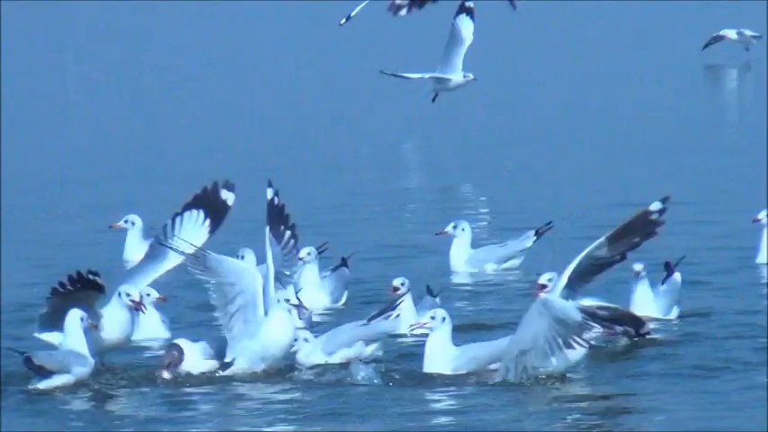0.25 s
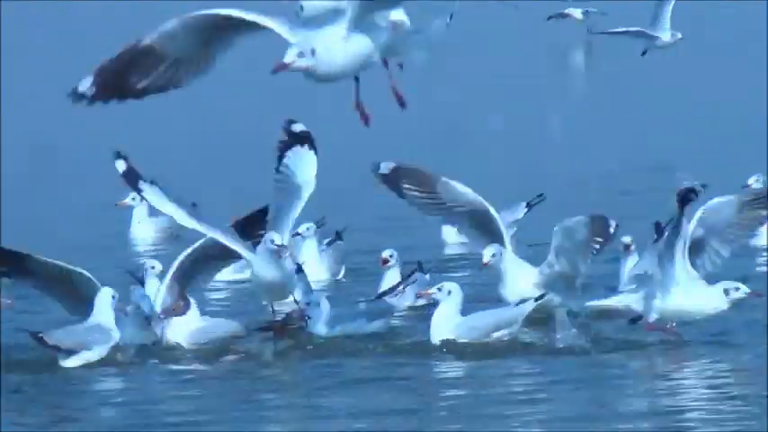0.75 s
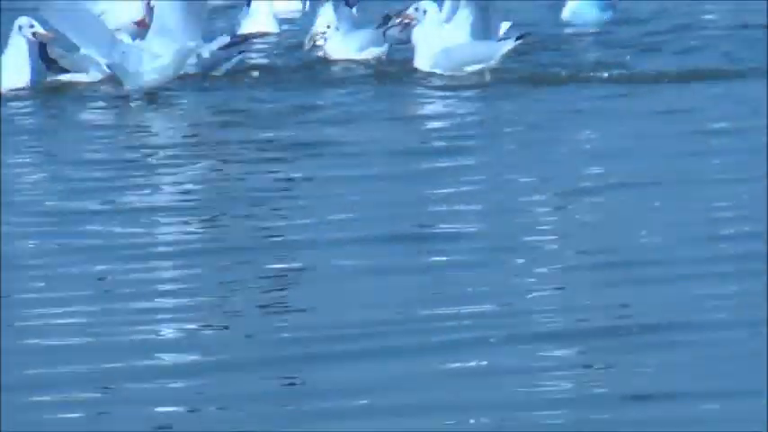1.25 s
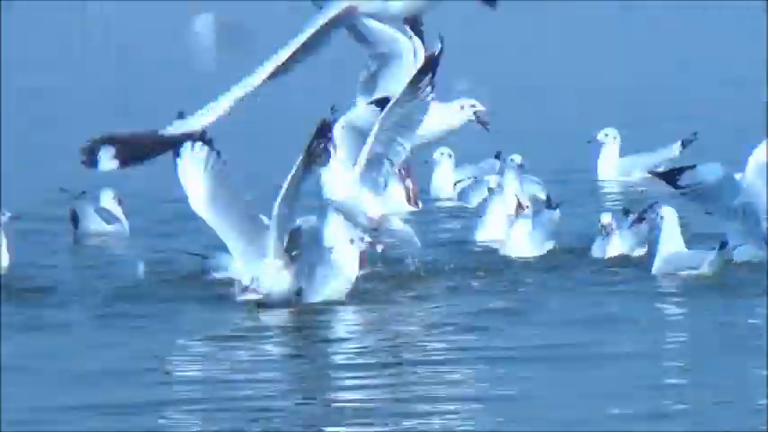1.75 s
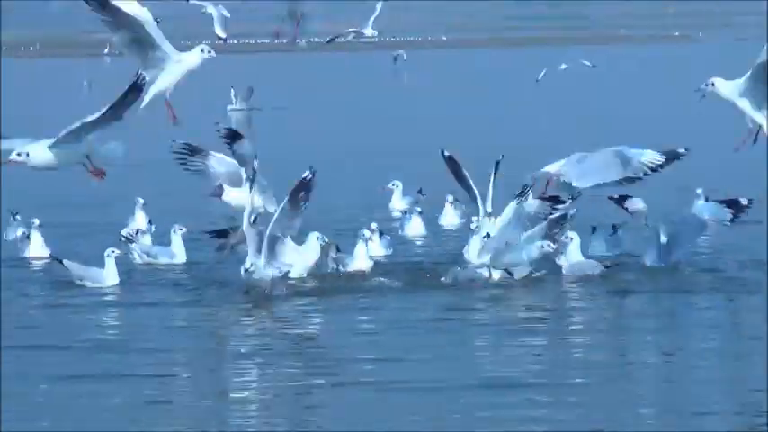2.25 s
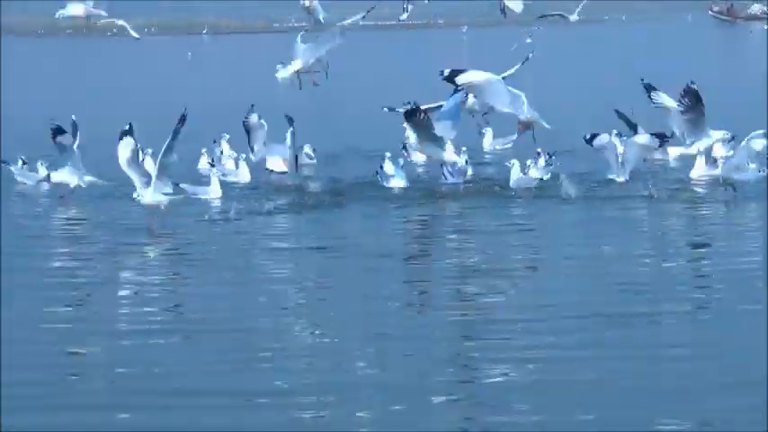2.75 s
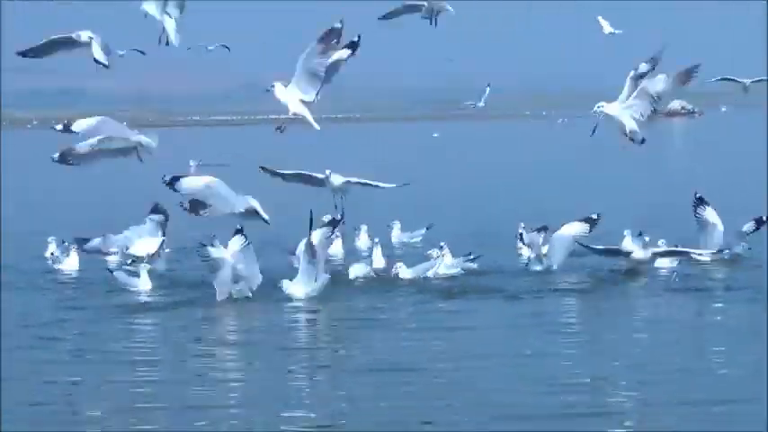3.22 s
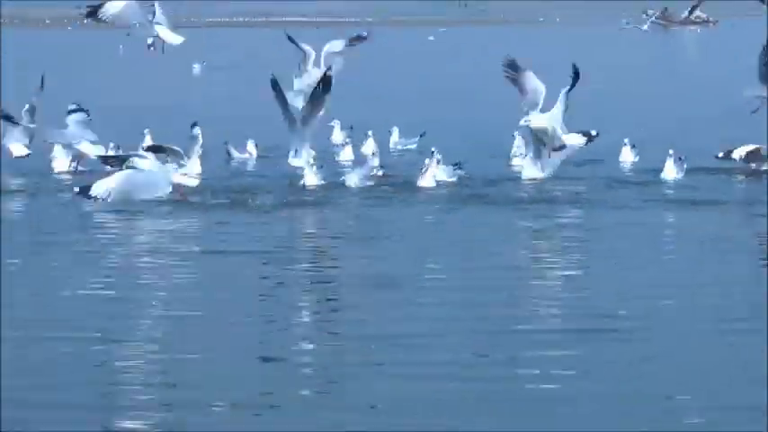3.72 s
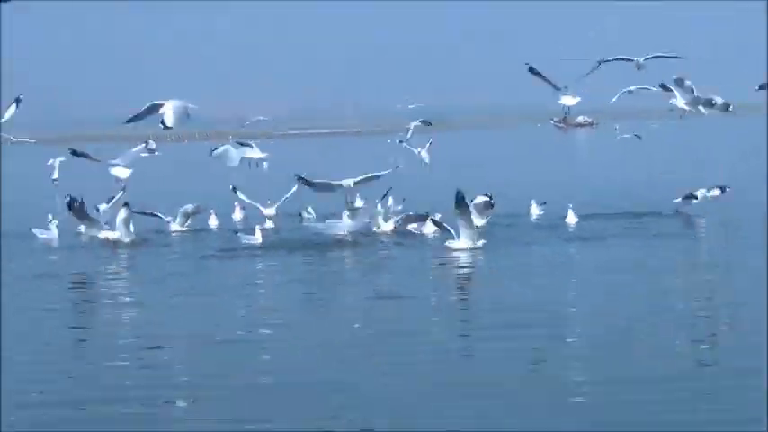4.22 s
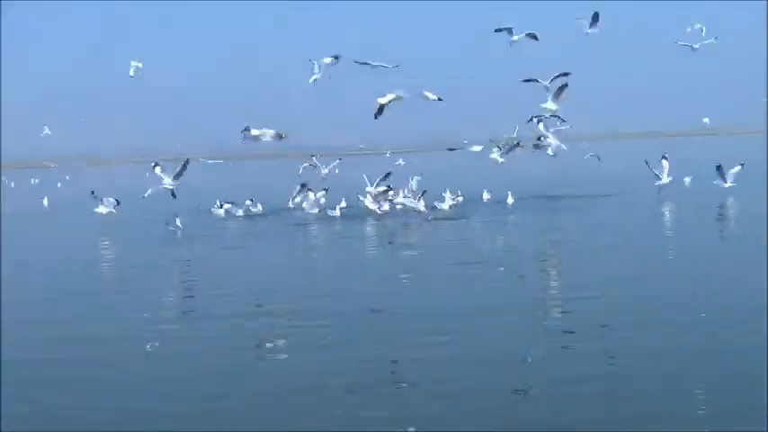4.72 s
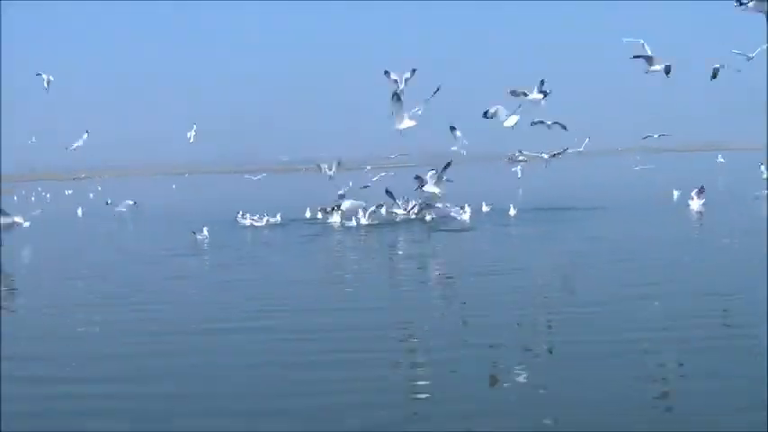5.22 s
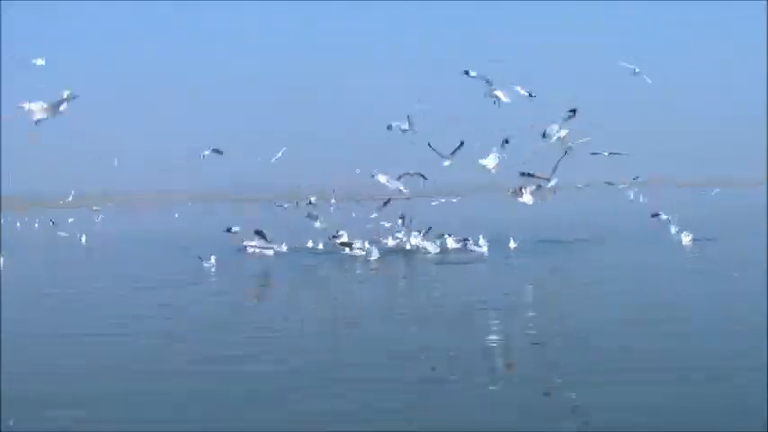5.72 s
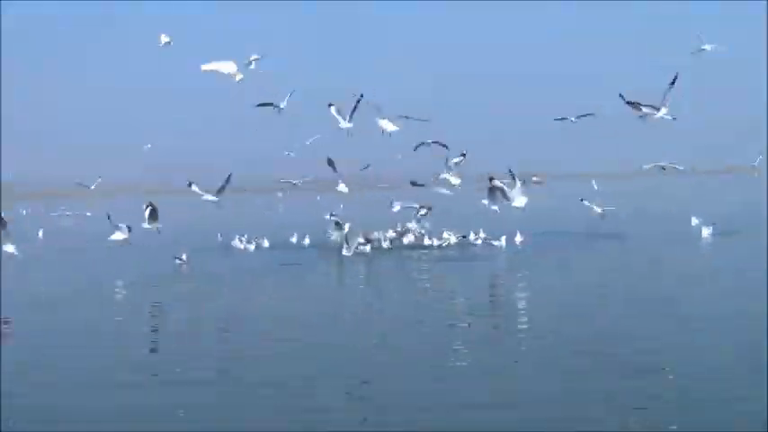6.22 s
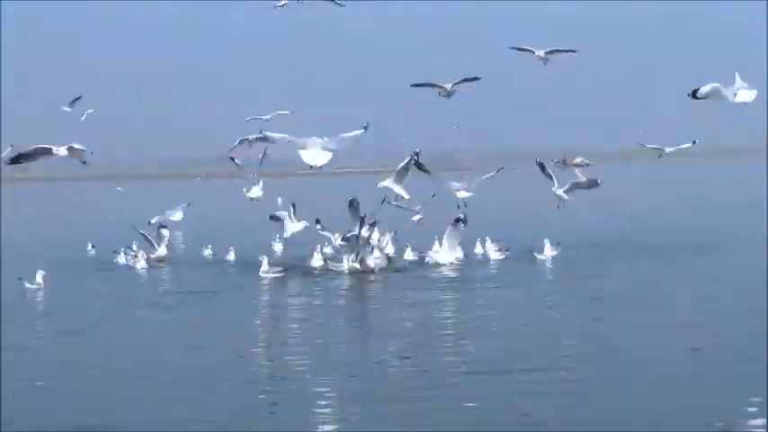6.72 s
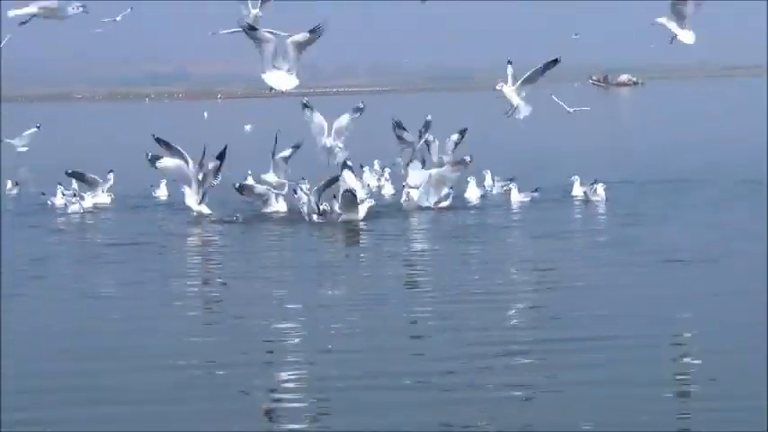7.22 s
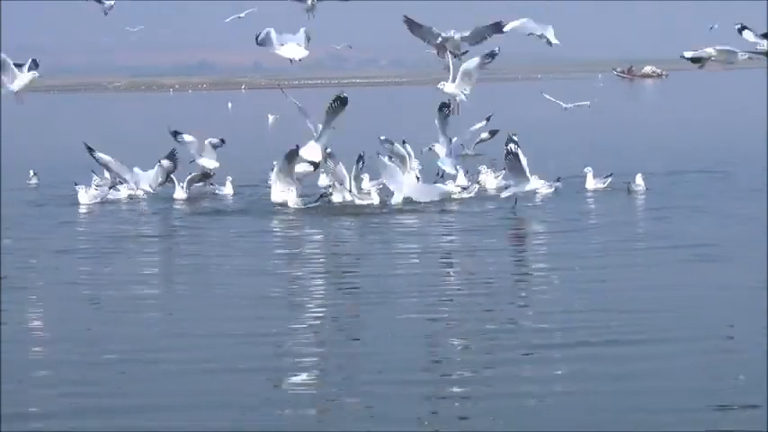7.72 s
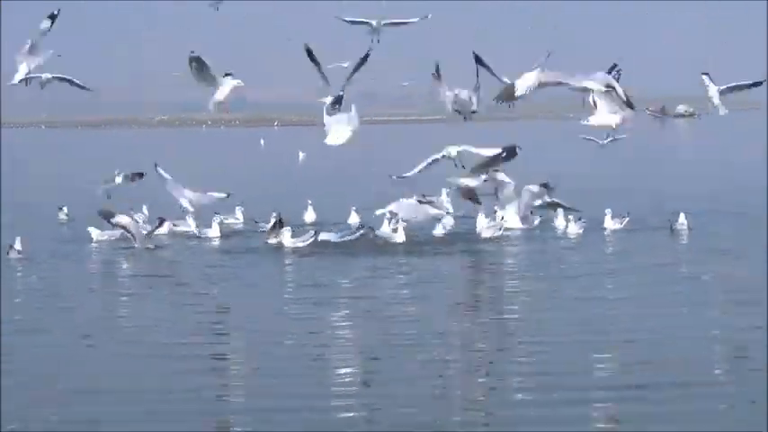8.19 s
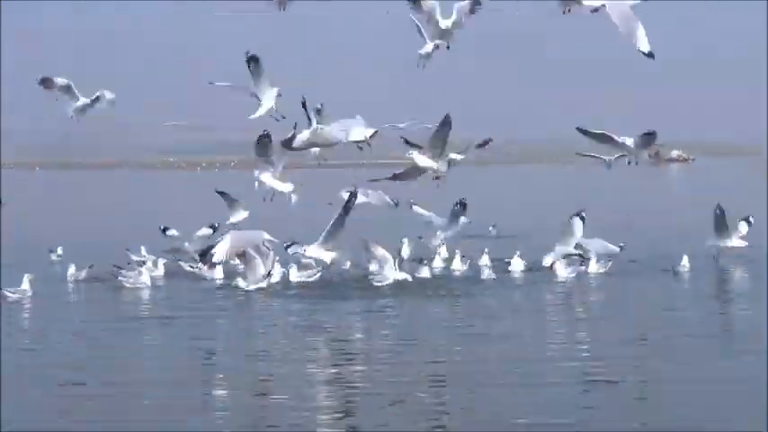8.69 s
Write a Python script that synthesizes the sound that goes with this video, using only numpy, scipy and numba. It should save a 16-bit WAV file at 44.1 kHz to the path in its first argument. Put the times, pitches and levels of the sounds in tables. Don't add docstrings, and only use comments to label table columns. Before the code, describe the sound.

After a brief silence, crowding gulls cry harshly and continuously, their choking squawks and thin young whistles mixed with wing slaps on water.

```python
import sys
import numpy as np
from scipy import signal
from scipy.io import wavfile
from scipy.ndimage import uniform_filter1d
from numba import njit

SR = 44100
rng = np.random.default_rng(int(sys.argv[2]) if len(sys.argv) > 2 else 0)


def invert_db(level):
    return 10 ** (np.asarray(level, dtype=float) / 20)


def to_wav(sig):
    pcm = np.clip(np.atleast_2d(sig), -1, 1) * 32767
    pcm = np.round(pcm).astype(np.int16)
    wavfile.write(sys.argv[1], SR, pcm.T)


N = 394694
TIME = np.arange(N) / SR

# start in seconds, length in seconds, level in dB,
# pulse rate in Hz, bill resonance in Hz.
GROWLS = [(1.02, 0.13, -11, 272, 2685), (1.13, 0.1, -16.5, 305, 2500), (1.38, 0.1, -12.5, 252, 2550),
          (1.88, 0.086, -25, 315.6, 2460), (2.3, 0.084, -11.5, 255.7, 2560), (2.51, 0.16, -23, 292.3, 2757),
          (2.75, 0.18, -20, 260.8, 2536), (3.43, 0.16, -23, 247.3, 2690), (3.873, 0.047, -13, 235.7, 3193),
          (3.92, 0.078, -21, 238, 2680), (4.91, 0.086, -23.5, 239, 3037), (5.0, 0.11, -22, 237.3, 3080),
          (5.59, 0.078, -19.5, 330, 2568), (6.0, 0.041, -22.5, 274, 2330), (6.29, 0.05, -21.5, 266.7, 2270),
          (6.69, 0.072, -25.5, 240, 2720), (7.52, 0.11, -18.5, 291, 2632), (7.86, 0.081, -19, 310.3, 2397),
          (8.2, 0.078, -11.5, 325.4, 2732), (8.67, 0.12, -21, 307, 2430), (8.79, 0.034, -15, 247.2, 2587),
          (8.85, 0.11, -31.5, 275, 2558)]
CROAKS = [(0.65, 0.088, -20, 338.4, 2510), (0.76, 0.11, -15.5, 337.2, 2410),
          (2.67, 0.071, -16.5, 385, 2370), (2.95, 0.12, -14, 250.3, 2320), (3.05, 0.073, -17, 276.8, 2440),
          (3.12, 0.075, -15, 278, 2410), (3.19, 0.078, -14, 260.2, 2387), (3.297, 0.026, -23, 333.5, 2487),
          (3.325, 0.06, -17, 332.4, 2950), (3.38, 0.055, -15, 334.5, 2317), (5.35, 0.068, -19, 408.7, 2399),
          (6.03, 0.079, -14.5, 433, 2358), (6.76, 0.13, -18.5, 348.9, 2579), (6.89, 0.14, -20, 350.4, 2505)]
SQUAWKS = [(0.96, 0.077, -16, 430.4, 2850), (1.49, 0.076, -21, 337, 2540), (1.59, 0.15, -20.5, 403.5, 2400),
           (1.81, 0.069, -20, 427, 2750), (1.96, 0.12, -13, 439.4, 2729), (4.14, 0.058, -23.5, 405, 2582),
           (5.11, 0.05, -19, 353.7, 2600), (5.17, 0.17, -26, 431.3, 2550), (5.41, 0.091, -19, 394, 2850),
           (5.67, 0.043, -17, 436.2, 2517), (5.71, 0.056, -14, 435, 2650), (5.77, 0.041, -22, 396, 2375),
           (5.81, 0.09, -20.5, 397, 2455), (5.905, 0.059, -18, 396, 2512), (6.1, 0.043, -23.5, 394.4, 2417),
           (6.15, 0.05, -14.5, 439.2, 2702), (6.34, 0.069, -17, 403.2, 2716), (6.405, 0.04, -21, 405, 2580),
           (6.445, 0.051, -26.5, 360, 2305), (6.5, 0.098, -17, 337.3, 2454), (6.59, 0.063, -19, 340, 2800),
           (6.65, 0.043, -17, 338.6, 2998), (7.04, 0.089, -12.5, 457.4, 2933),
           (7.14, 0.074, -15, 435, 2670), (7.22, 0.13, -25.5, 361.6, 2452), (7.35, 0.12, -14, 439, 2760),
           (7.63, 0.058, -25.5, 360.8, 2650), (7.94, 0.095, -12, 361.4, 2660)]
SCREAMS = [(2.15, 0.048, -26.5, 551, 3050), (2.19, 0.098, -21, 546, 3160),
           (2.38, 0.069, -25.5, 514.2, 2860), (3.69, 0.18, -25, 474, 2738), (4.0, 0.056, -17.5, 533, 3072),
           (4.06, 0.078, -18.5, 535.3, 3080), (4.21, 0.045, -15.5, 517, 3160),
           (4.335, 0.09, -17, 514, 3187), (4.42, 0.079, -20.5, 515.3, 3090), (4.53, 0.05, -18, 509, 3190),
           (4.648, 0.032, -13.5, 517.7, 2610), (4.68, 0.041, -20.5, 518.5, 2610),
           (4.75, 0.084, -21.5, 471.3, 2777), (4.83, 0.057, -20, 471.2, 3280), (6.2, 0.047, -23, 498, 2982),
           (6.25, 0.049, -21, 500.3, 2530), (7.69, 0.18, -20.5, 495.6, 2665),
           (8.04, 0.15, -19.5, 528.6, 2880), (8.38, 0.044, -27.5, 478.8, 2800),
           (8.42, 0.059, -15, 527.6, 2832), (8.47, 0.17, -19, 531, 2780), (8.29, 0.069, -26, 487.3, 2300),
           (8.822, 0.037, -19, 520.5, 2750)]
PURRS = [
    (0.928, 0.04, -23.5, 410, 1900),
    (4.26, 0.066, -30.5, 301, 2110),
    (1.34, 0.041, -22, 356, 2070),
    (1.7, 0.12, -14.5, 391.5, 2590),
    (5.53, 0.055, -17, 302, 2670),
]
HOARSE_BIRDS = [(GROWLS, .85, 0.94), (CROAKS, .75, 0.93), (SQUAWKS, .68, 0.97), (SCREAMS, .58, 1),
                (PURRS, .22, 1.036)]
# level in dB, pulse rate in Hz, roughness from 0 to 1, bill resonance in Hz.
HOARSE_MURMUR = (-42, 300, 0.5, 2400)

# start in seconds, length in seconds,
# treble level in dB, pulse rate in Hz.
RASPS = [(1.04, 0.13, -34, 246.4), (1.37, 0.17, -29, 509), (1.54, 0.21, -35, 330),
         (1.81, 0.078, -28.5, 402.2), (1.97, .12, -29, 436), (2.17, 0.28, -28.5, 507.7),
         (2.58, 0.3, -33, 526.6), (2.84, 0.18, -33.5, 263.8), (2.99, 0.21, -29, 261.2),
         (3.17, 0.15, -32, 251.5), (3.325, 0.17, -33.5, 482), (3.82, 0.046, -38.5, 256.2),
         (3.87, 0.041, -23, 496), (3.98, 0.15, -26.5, 519), (5.1, 0.095, -32, 433.3),
         (5.33, 0.16, -30.5, 404), (5.58, 0.094, -32.5, 471.7), (5.7, 0.065, -29, 469),
         (5.79, 0.15, -30, 463.8), (5.93, 0.031, -31, 455), (6.05, 0.049, -27.5, 405.2),
         (6.1, .12, -34, 418.6), (6.25, 0.23, -37.5, 454), (6.5, 0.064, -31, 451),
         (6.58, 0.15, -35.5, 446.4), (6.72, .18, -32.5, 418.5), (6.9, 0.095, -29.5, 399.2),
         (7.23, 0.11, -38, 448.6), (7.33, .14, -26, 435), (7.47, .12, -38, 277.8)]
RATTLES = [(1.197, 0.04, -32, 504.3), (1.71, 0.097, -30, 393.6), (3.69, .13, -29.5, 478.6),
           (4.17, 0.084, -28.5, 522.5), (4.35, .16, -24, 525.2), (4.64, 0.038, -29, 525.6),
           (4.74, 0.16, -26, 437.4), (5.01, 0.059, -27, 485.6), (5.23, 0.051, -28, 420.6),
           (7.04, .09, -30, 455), (7.145, 0.076, -22, 434.3), (8.04, 0.115, -28.5, 531.5),
           (8.47, 0.15, -29, 529.6), (8.822, 0.035, -32.5, 518.4)]
SHRIEKS = [(.65, 0.28, -35.5, 379), (.68, 0.019, -25, 294.4), (.95, 0.079, -34.5, 482),
           (3.51, 0.052, -29, 474.6), (3.91, 0.074, -31.5, 454.3), (4.325, 0.025, -33.5, 467.4),
           (4.51, 0.076, -35, 499.6), (4.58, 0.18, -35.5, 449.5), (4.89, 0.095, -31, 417.4),
           (6.22, 0.031, -33, 524.4), (7.0, 0.043, -29.5, 314), (7.67, 0.19, -28.5, 398),
           (7.85, 0.05, -32, 315), (7.94, 0.12, -26, 353.6), (8.18, 0.11, -29, 306.7),
           (8.39, 0.044, -30, 346.6), (8.434, 0.025, -20.5, 270.3), (8.79, 0.029, -28.5, 246)]
# cries, roughness from 0 to 1, top resonances over the lower ones in dB.
BRIGHT_BIRDS = [(RASPS, .92, -3.19), (RATTLES, .6, -5), (SHRIEKS, .8, 2.9)]
# treble level in dB, pulse rate in Hz, roughness, top over lower in dB.
BRIGHT_MURMUR = (-45, 330, 4.5, -4)

# centre in Hz, width in Hz, level in dB.
BRIGHT_THROAT = [(1390, 340, 1.5), (3240, 1130, 2.5), (5470, 1100, -5.5), (6255, 520, -6.5)]
BRIGHT_TOP = [(7850, 1800, -5.5), (9650, 1240, -4.5), (11120, 2360, -8)]

# centre in seconds, length in seconds, level change in dB (nearly
CHOKES = [(0.806, 0.0043, -8), (0.8357, 0.0068, -4), (0.91, 0.0036, -17), (1.2, 0.011, 1),
          (1.2618, 0.0074, -6), (1.2965, 0.0026, -8), (1.323, 0.013, -14), (1.664, 0.0034, -4),
          (1.8323, 0.0059, -16), (1.88, 0.0031, -15), (1.928, 0.004, -8.5), (2.07, 0.007, -3),
          (2.169, 0.0056, -9.5), (2.1904, 0.0025, -20), (2.2155, 0.0032, -12), (2.242, 0.0056, -16),
          (2.4881, 0.0083, -16), (2.5896, 0.005, -10.5), (2.6217, 0.0044, -8.5),
          (2.6451, 0.0045, -16), (2.668, 0.0041, -6), (3.006, 0.0015, 5.5), (3.2954, 0.0063, -2),
          (3.3183, 0.0043, -9), (3.435, 0.0075, -7), (3.504, 0.0044, -11), (3.5293, 0.0058, -19),
          (3.547, 0.0033, -17), (3.67, 0.0035, -6), (3.691, 0.0059, -13.5), (3.7095, 0.0033, -11),
          (3.808, 0.0041, -15), (3.824, 0.0067, -10), (3.85, 0.0068, -12.5), (3.869, 0.0042, -11.5),
          (3.889, 0.0054, -6), (3.929, 0.0057, -7), (3.968, 0.011, -6), (3.993, 0.0034, -19),
          (4.011, 0.0046, -13), (4.028, 0.0038, -6), (4.1187, 0.0041, -16), (4.162, 0.0066, -8),
          (4.184, 0.007, -8), (4.203, 0.0031, -4), (4.2246, 0.0028, -13), (4.2396, 0.0032, -10),
          (4.31, 0.003, -0.5), (4.545, 0.0027, -18), (4.5643, 0.0049, -26), (4.596, 0.0067, -9),
          (4.625, 0.0094, -8), (4.6789, 0.0077, -7), (4.729, 0.0084, -5), (4.793, 0.0068, -4.5),
               (4.8691, 0.0069, -6.5), (4.956, 0.004, -11), (5.0, 0.0036, -16), (5.0777, 0.0043, -6.5),
               (5.4901, 0.0038, -10.5), (5.5986, 0.0052, -9), (5.6224, 0.0052, -11.5),
               (5.641, 0.0075, -11.5), (5.6581, 0.0043, -9.5), (5.7582, 0.0061, -8),
               (5.7948, 0.0039, -14.5), (5.809, 0.0065, -9), (5.8875, 0.0029, -10), (5.9295, 0.005, -13.5),
               (5.9489, 0.0066, -11), (5.987, 0.014, -8), (6.1311, 0.0087, -9), (6.2307, 0.0023, -12),
               (6.2498, 0.005, -12), (6.3205, 0.006, -9.5), (6.3423, 0.0036, -8.5), (6.3642, 0.0027, -9.5),
               (6.3889, 0.0032, -8), (6.468, 0.0071, -9), (6.4916, 0.0051, -10.5), (6.5288, 0.0096, -11),
               (6.5465, 0.0032, -8), (6.6514, 0.0027, -8.5), (6.6911, 0.0052, -13), (6.9194, 0.0037, -7),
               (7.0227, 0.011, -13), (7.061, 0.0046, -8.5), (7.0773, 0.005, -16.5), (7.0974, 0.0068, -9),
               (7.1134, 0.0037, -15), (7.1318, 0.0075, -9), (7.2314, 0.0038, -7.5), (7.3318, 0.0034, -8.5),
               (7.4541, 0.0031, -6), (7.4741, 0.0061, -7.5), (7.5064, 0.005, -4.5), (7.8245, 0.0033, -2),
               (7.8827, 0.002, -10), (8.0591, 0.0026, -15), (8.1076, 0.0038, -9), (8.1357, 0.0072, -8),
               (8.1534, 0.0042, -20), (8.1924, 0.0058, -1), (8.3035, 0.003, -8.5), (8.8384, 0.0059, -4),
               (8.8575, 0.0047, -14.5), (8.8835, 0.0044, -8)]
# start in seconds, first gap in seconds,
# stretch of each next gap as a factor, number of chokes (whole part), depth in dB.
CHOKE_RUNS = [
    (3.037, 0.0085, 1.32, 5.2, -2),
    (4.342, 0.019, 1.2, 2.6, -6),
    (8.469, 0.018, 1.03, 9.8, -7),
]

# start in seconds, peak level in dB.
SLAPS = [(0.697, -17), (1.254, -33), (1.903, -27), (2.108, -21.5), (2.2206, -16), (2.448, -27),
         (3.662, -27), (5.498, -27.5), (5.952, -30.5), (6.8967, -23), (6.94, -17), (7.2585, -23)]

# time in seconds, strongest partial in Hz, level in dB.
WHISTLES = [
    [(1.45, 2416, -24), (1.49, 2540, -15.5), (1.55, 2580, -13), (1.66, 2420, -24)],
    [(2.29, 2226, -19.5), (2.35, 2204, -19.5), (2.42, 2042, -22.5)],
    [(2.715, 2580, -20), (2.765, 2650, -17), (2.79, 2635, -12), (2.83, 2736, -15.5), (2.89, 2532, -14),
     (2.945, 2536, -16.5)],
    [(2.945, 1910, -12), (2.965, 1720, -28), (2.99, 1660, -17)],
    [(5.14, 2623, -20), (5.19, 2690, -21), (5.24, 2510, -14), (5.31, 2594, -15.5), (5.375, 2594, -19.5)],
    [(7.8, 2515, -23), (7.9, 2494, -20.5), (7.965, 2416, -18)],
    [(8.48, 1948, -25), (8.52, 2043, -20), (8.585, 2073, -15)],
]
# overtone level in dB, half-rate line level in dB.
WHISTLE_EDGE = [(-7.5, -8), (-4, 1.5), (-5.5, -9.5), (-2, 5), (-5.5, -33), (-11.5, -22), (-21, -2)]
# multiple of the strongest partial, level in dB.
PARTIALS = [(1.5, -7), (2, -7.5), (2.5, -16), (3, -23.5), (4, -23.5)]

# time in seconds, level in dB.
CROWD = [(0.66, -29.5), (0.87, -19.5), (0.91, -30), (1.2, -25), (2.88, -24.5), (2.92, -65), (3.01, -22),
         (3.54, -24.5), (3.66, -24), (3.73, -26), (6.4, -23.5), (6.75, -24), (7.45, -24.5), (7.66, -30),
         (7.77, -15.5), (7.91, -38), (8.02, -25.5), (8.86, -27.5)]
# centre in Hz, width in Hz, level in dB.
CROWD_THROAT = [(1410, 286, 12.5), (2180, 89, 13.5), (912, 315, 5.5)]
CHEST = [(240, 223, 0), (330, 172, -3), (497.6, 48, 0), (673, 196, -2)]

# frequency in Hz, level in dB per Hz.
WATER = [(15, -52), (25, 4.5), (340, -2.5), (1110, 6.5), (1410, 2), (1800, -27.5), (2560, 9.5), (6380, -47),
         (9550, -8), (15500, -54)]
# time in seconds, level in dB.
CHURN = [
    (0.66, 2.5),
    (1.6, -0.5),
    (2.9, 0.5),
    (3.6, 1.5),
    (7.7, 2),
    (8.6, 0),
]

# frequency in Hz, level in dB.
WHINE = [(15625, -63), (15575, -69), (15675, -69)]


def level(x, db):
    return x * invert_db(db) / np.sqrt(np.mean(x ** 2))


def curves(table):
    s, *columns = np.transpose(table)
    return [np.interp(TIME, s, c) for c in columns]


def walk(rate):
    k = int(SR / rate)
    held = np.repeat(rng.standard_normal(N // k + 1), k)
    return 1.3 * uniform_filter1d(uniform_filter1d(held, k), k)[:N]


def place(x, pan_db):
    return np.array([x * invert_db(pan_db / 2), x * invert_db(-pan_db / 2)])


@njit
def svf(x, hz, width):
    y, band, low = np.empty(len(x)), 0., 0.
    for i in range(len(x)):
        g, k = np.tan(np.pi * hz[i] / SR), width[i] / hz[i]
        v = (band + g * (x[i] - low)) / (1 + g * (g + k))
        low += 2 * g * v
        band = 2 * v - band
        y[i] = k * v
    return y


@njit
def beat(hz, jitter, stall, wobble, size, stalled):
    pulses, phase, k = np.zeros(len(hz) + 1), 0., 0
    for i in range(len(hz)):
        step = hz[i] * max(1 + jitter[i] * wobble[k], .4) / SR
        phase += step
        if phase >= 1:
            phase, k = phase - 1, k + 1
            push = size[k] * (1 - stall[i] * stalled[k])
            pulses[i] += push * phase / step
            pulses[i + 1] += push * (1 - phase / step)
    return pulses[:-1]


def syrinx(hz, rough, scatter_db, deepest):
    beats = N // 40
    wobble, scatter = rng.standard_normal((beats, 2)).T
    runs = rng.integers(5, 13, beats)
    tension, force = np.repeat(rng.standard_normal((beats, 2)), runs, axis=0)[:beats].T
    count = np.arange(beats) - np.repeat(np.cumsum(runs) - runs, runs)[:beats]
    wobble = .6 * wobble + .9 * tension
    scatter = .7 * scatter + .9 * force + .25 * count
    stalls = np.cumsum(runs[:beats // 13])
    stalled = np.zeros(beats)
    stalled[stalls] = stalled[stalls + 1] = 1
    jitter = .01 + .06 * rough ** 1.5
    stall = np.clip(12 * rough - 3.1, 0, deepest)
    pulses = level(beat(hz, jitter, stall, wobble, invert_db(scatter_db * scatter), stalled), 0)
    puff = signal.lfilter([1], [1, -np.exp(-1 / (0.0091 * SR))], pulses)
    return -pulses + .22 * rough * level(puff * rng.standard_normal(N), 0)


def throat(x, modes, drift, patchy_db):
    out = 0
    for k, (hz, width, db) in enumerate(modes):
        centre = hz * (1 + drift * walk(6))
        broad = 1.373 * width + 0 * centre
        ring = svf(svf(x, centre, broad), centre, broad)
        out = out + (-1) ** k * invert_db(db + patchy_db * walk(16)) * ring
    return out


def cries(birds, murmur, edge_s, arch, swell_db, lift=0):
    attack_db_per_s, release_db_per_s, margin_s = 1700, 1000, .05
    lead = np.repeat(np.array(murmur, float)[:, None], N, axis=1)
    for table, rough, colour in birds:
        for s, length, db, hz, *own in table:
            span = slice(int((s - margin_s) * SR), min(int((s + length + margin_s) * SR), N))
            age = TIME[span] - s
            bow = 1 / 3 - (2 * np.clip(age / length, 0, 1) - 1) ** 2
            fade_db = np.maximum(-age * attack_db_per_s, (age - length) * release_db_per_s)
            cry = np.array([db + swell_db * bow - np.maximum(0, fade_db),
                            hz * (1 + arch * (1.3 - rough) * bow),
                            rough + 0 * bow,
                            colour * np.prod(own) * (1 + lift * bow)])
            lead[:, span] = np.where(cry[0] > lead[0, span], cry, lead[:, span])
    db, hz, rough, colour = lead
    db, colour = (uniform_filter1d(c, int(edge_s * SR)) for c in (db, colour))
    return db, hz, np.clip(rough, 0, 1), colour


def voices(hz, rough, scatter_db):
    rival = syrinx(380 * invert_db(1.6 * walk(11)), .6 + 0 * rough, scatter_db, 0.88) * invert_db(3.5 * walk(14))
    share = np.clip(.65 * rough ** 2, 0, 1)
    return (syrinx(hz, rough, scatter_db, 0.46) + share * rival) / np.sqrt(1 + share ** 2)


def chokes():
    stalls = CHOKES
    for s, gap, stretch, n, db in CHOKE_RUNS:
        for k in range(int(n)):
            stalls = stalls + [(s + gap * np.sum(stretch ** np.arange(k)), 0.004, db)]
    drop_db = np.zeros(N)
    for s, length, db in stalls:
        span = slice(int((s - .02) * SR), int((s + .02) * SR))
        drop_db[span] += db * np.exp(-((TIME[span] - s) / (0.49 * length)) ** 4)
    return drop_db


def open_bill(x, hz, bill_hz):
    gape = uniform_filter1d(hz, 400)
    wide = np.clip((gape - 440) / 70, 0, 1)
    modes = [(1.117 * bill_hz, 0.8 * gape, 0),
             (0.883 * bill_hz, 1.29 * gape, -1 - 2.7 * wide),
             (1.374 * bill_hz, 1.6 * gape, -11)]
    ring = throat(x, modes, .02, 1.3) + .015 * x
    rasp = svf(x, 1.56 * bill_hz, 0.61 * bill_hz)
    deep = svf(svf(x, 0.52 * bill_hz, gape), 0.52 * bill_hz, gape)
    return ring + invert_db(-17.5) * rasp + invert_db(-11.0) * wide * deep


def near_birds():
    top_db, top_hz, top_rough, tilt_db = cries(BRIGHT_BIRDS, BRIGHT_MURMUR, 0.0027, .15, 5.5)
    db, hz, rough, bill_hz = cries(HOARSE_BIRDS, HOARSE_MURMUR, 0.0056, .15, 5.5, lift=0.096)
    same = abs(hz / top_hz - 1) < .08
    close = voices(top_hz, np.where(same, np.minimum(rough, top_rough), top_rough), 1.0)
    bright = invert_db(-tilt_db / 2) * throat(close, BRIGHT_THROAT, 0.086, 2.1)
    bright = bright + invert_db(tilt_db / 2) * throat(close, BRIGHT_TOP, 0.028, 1.9)
    bill = open_bill(np.where(same, close, voices(hz, rough, 1.8)), hz, bill_hz)
    choke_db = 1.46 * chokes()
    hoarse = level(bill, -1) * invert_db(db + choke_db + .8 * walk(18))
    bright = level(bright, 7.57) * invert_db(top_db + choke_db + 1.2 * walk(30))
    return place(hoarse, 1.0 + 0.47 * walk(4.084)) + place(bright + slaps(), 0.3 + 1.4 * walk(6))


def slaps():
    size = 400
    out, t = np.zeros(N), TIME[:size]
    for s, db in SLAPS:
        hiss = svf(rng.standard_normal(size), 7500 + 0 * t, 5000 + 0 * t)
        start = int(s * SR)
        out[start:start + size] += invert_db(db + 7.5) * np.exp(-t / 0.0043) * hiss
    return out


def whistle(rows, edge):
    hz, db = curves(rows)
    phase = 2 * np.pi * np.cumsum(uniform_filter1d(hz, 900) * (1 + 0.0045 * walk(150))) / SR
    ends = np.clip(np.minimum(TIME - rows[0][0], rows[-1][0] - TIME) / 0.0028, 0, 1)
    tone = np.sin(phase)
    for multiple, partial_db in PARTIALS:
        edge_db = edge[int(2 * multiple % 2)]
        tone = tone + invert_db(partial_db + edge_db + 2.5 * walk(22)) * np.sin(multiple * phase)
    return np.sqrt(2) * ends * invert_db(db + 2.4 * walk(40)) * tone


def crowd():
    out, (db,), (churn_db,) = 0, curves(CROWD), curves(CHURN)
    near_db = cries(HOARSE_BIRDS, HOARSE_MURMUR, 0.051, 0, 4.0)[0]
    db = db + 0.76 * np.minimum(near_db + 20.5 - 1, 0) + 0.24 * chokes()
    for _ in range(3):
        x = syrinx(420 * invert_db(1.6 * walk(9)), .8 + 0 * TIME, 2.5, .93) * invert_db(2.8 * walk(11))
        grunt = x + 0.56 * rng.standard_normal(N)
        call = invert_db(db) * level(throat(x, CROWD_THROAT, 0.05, 3.45), -2.0)
        chest = invert_db(db / 2 + churn_db) * level(throat(grunt, CHEST, 0.037, 0.72), -24.5)
        out = out + place(call + chest, 1.6 * walk(2.1) + 2.0)
    return out


def water():
    out, swell, (churn_db,) = 0, walk(3.9), curves(CHURN)
    hzs, dbs = np.transpose(WATER)
    for hz in 28 * 2 ** np.arange(0, 9.2, .4):
        mid, side = (svf(rng.standard_normal(N), hz + 0 * TIME, hz / 3 + 0 * TIME) for _ in range(2))
        db = np.interp(np.log(hz), np.log(hzs), dbs) + churn_db + .8 * swell + 1.2 * walk(12)
        spread = min(0.1 + hz / 900, 0.3)
        out = out + invert_db(db) * (mid + spread * side * np.array([[1], [-1]]))
    return level(out, -30.5)


def scene():
    young = place(sum(map(whistle, WHISTLES, WHISTLE_EDGE)), 0.44)
    birds = near_birds() + young + crowd()
    tail = rng.standard_normal((2, 4000)) * np.exp(-TIME[:4000] / 0.0022)
    scatter = signal.fftconvolve(birds, tail / np.linalg.norm(tail[0]), axes=1)[:, :N]
    return birds + invert_db(-16.0) * scatter + water()


def band_limit(x):
    return signal.sosfilt(signal.butter(12, 15750, fs=SR, output="sos"), x)


def record(dry):
    start_s, fade_s, drive = .651, 0.0084, 1.12
    whine = sum(np.sqrt(2) * invert_db(db) * np.sin(2 * np.pi * hz * TIME) for hz, db in WHINE)
    x = np.tanh(drive * (dry + whine)) / drive
    x = signal.sosfilt(signal.butter(2, 55, "high", fs=SR, output="sos"), x)
    mix = x * np.clip((TIME - start_s) / fade_s, 0, 1)
    return band_limit(mix)


dry = scene()
out = record(dry)
to_wav(out)
```